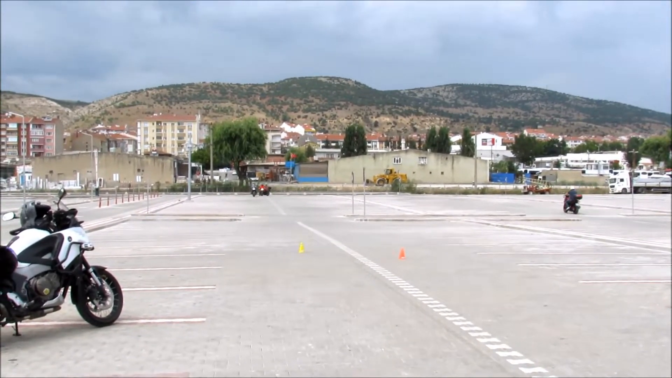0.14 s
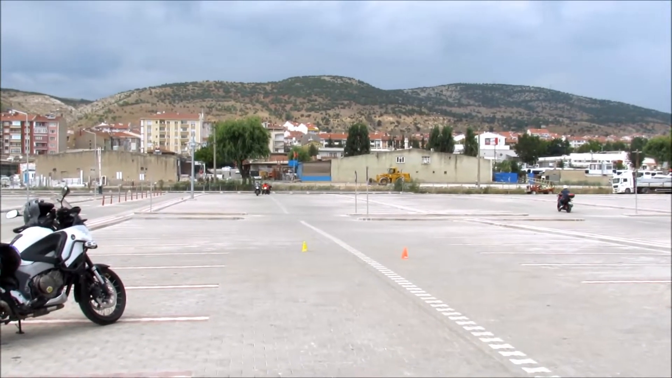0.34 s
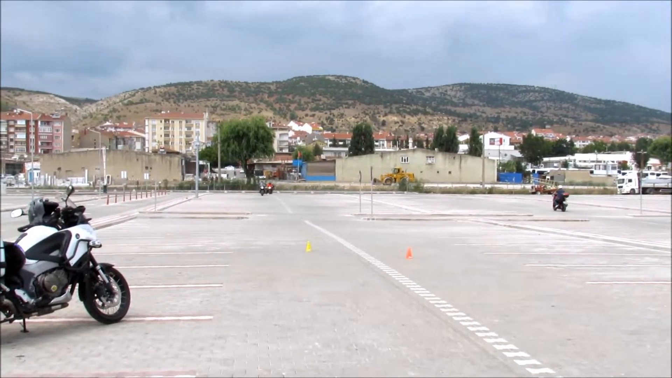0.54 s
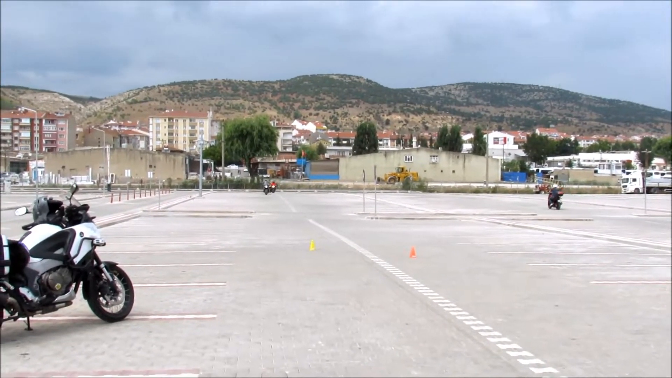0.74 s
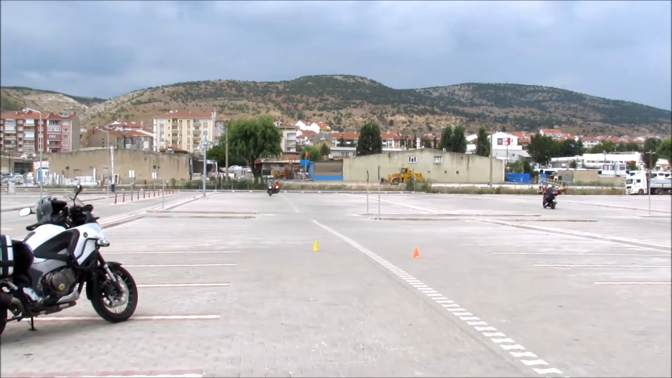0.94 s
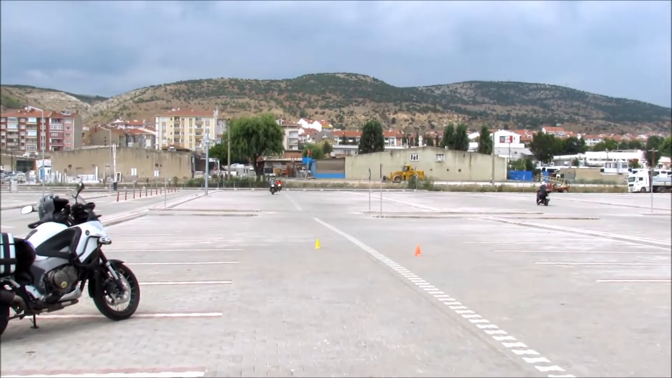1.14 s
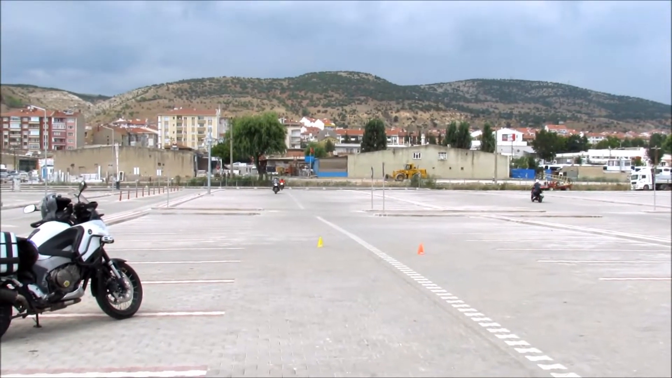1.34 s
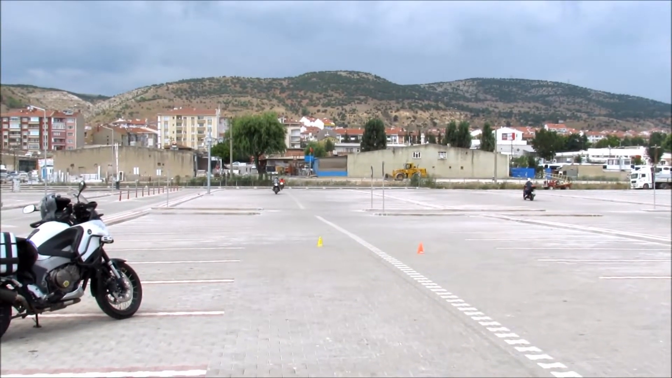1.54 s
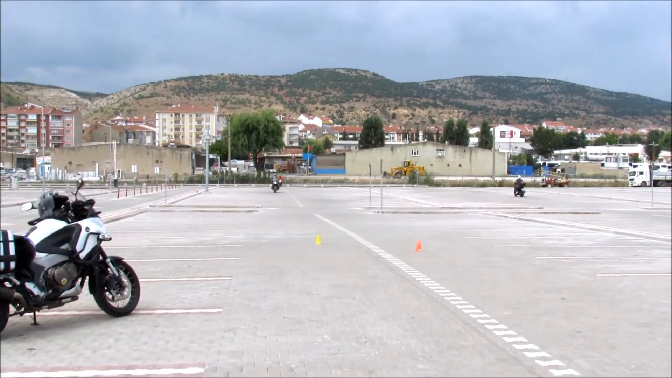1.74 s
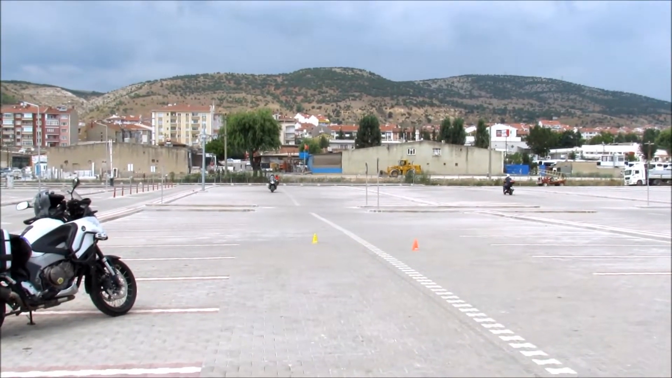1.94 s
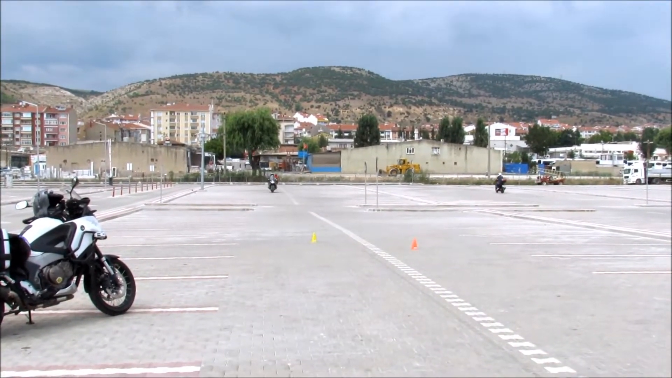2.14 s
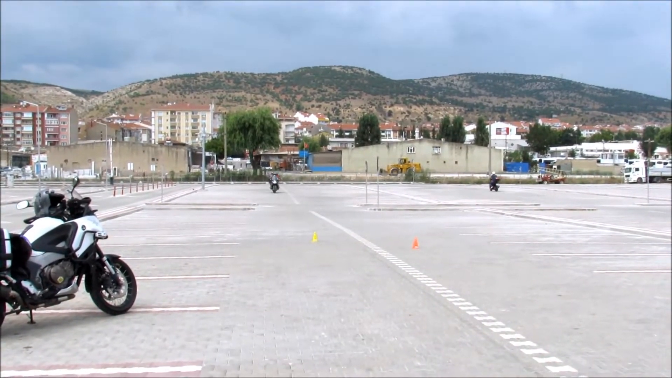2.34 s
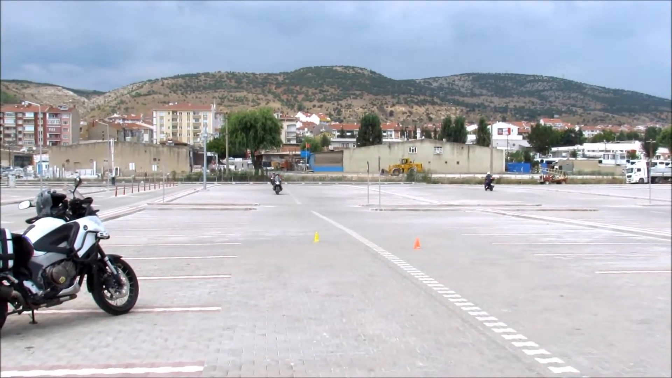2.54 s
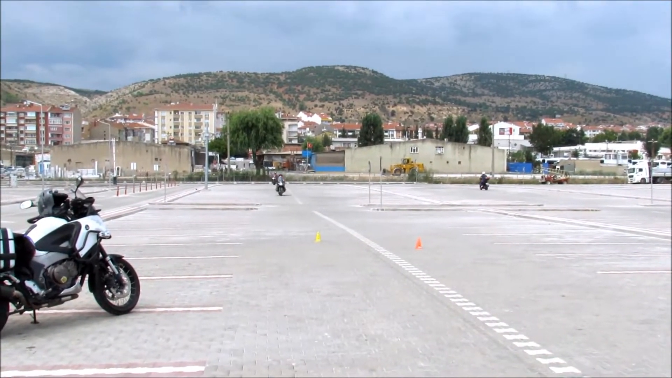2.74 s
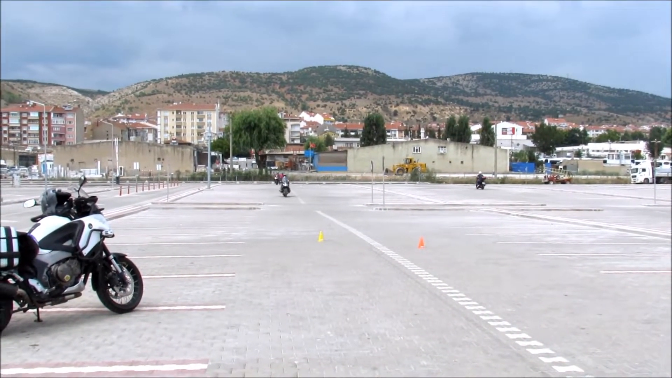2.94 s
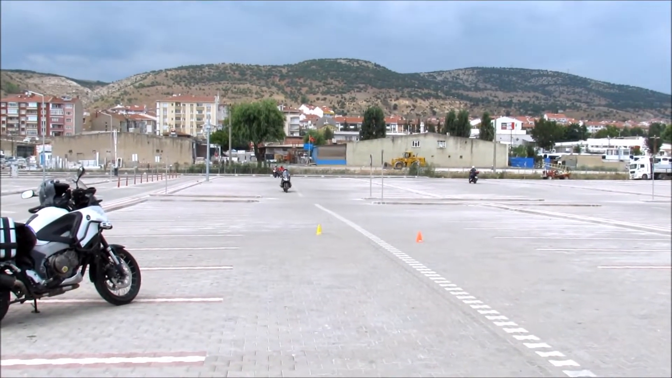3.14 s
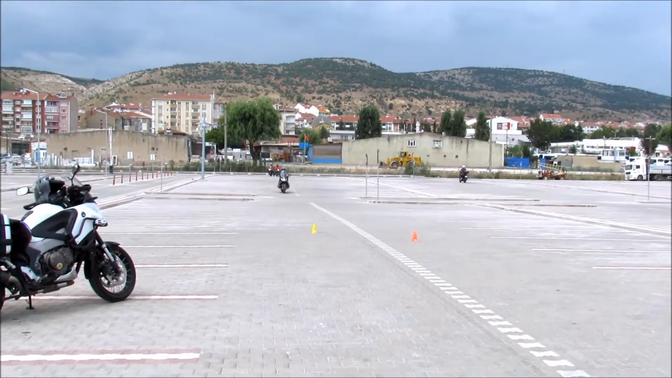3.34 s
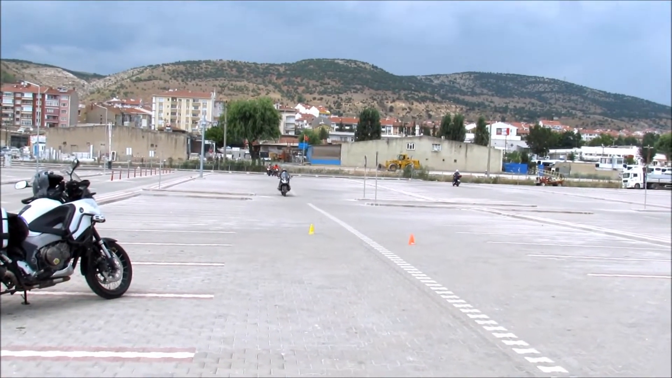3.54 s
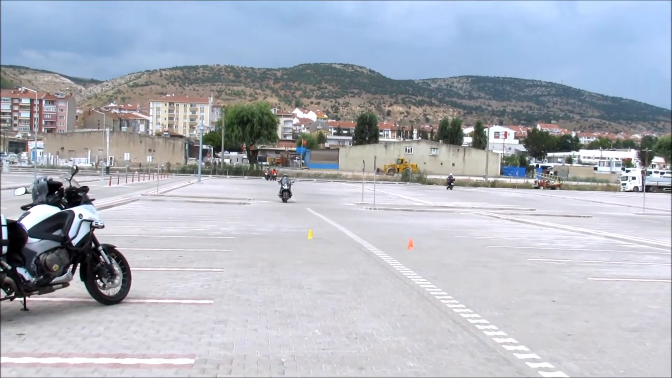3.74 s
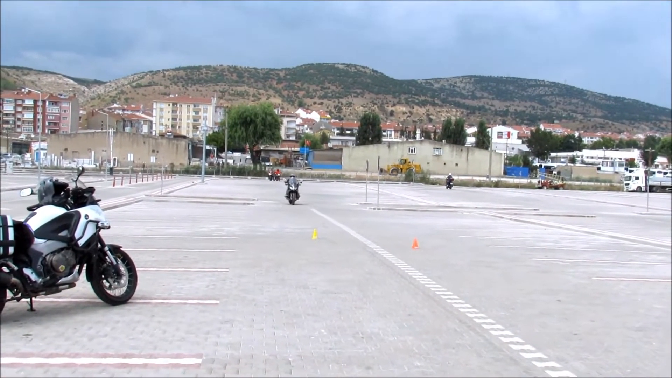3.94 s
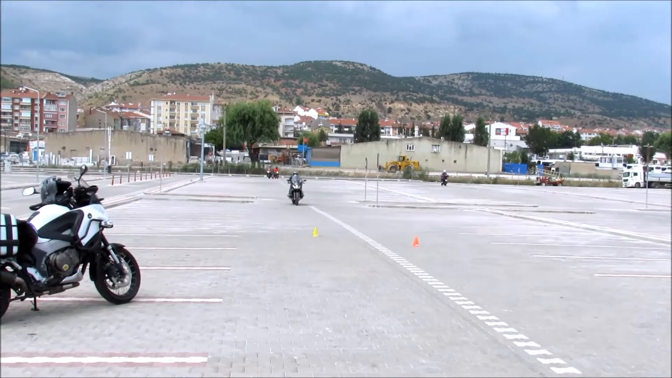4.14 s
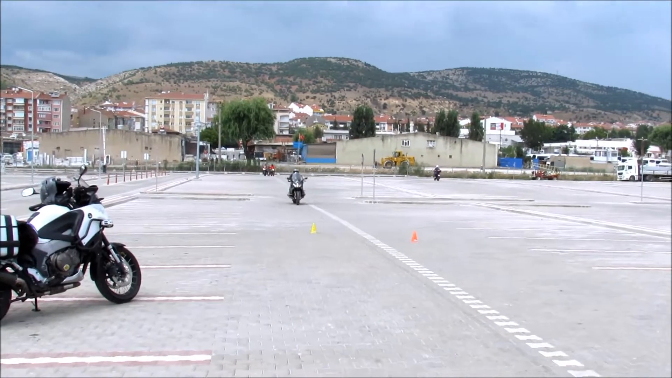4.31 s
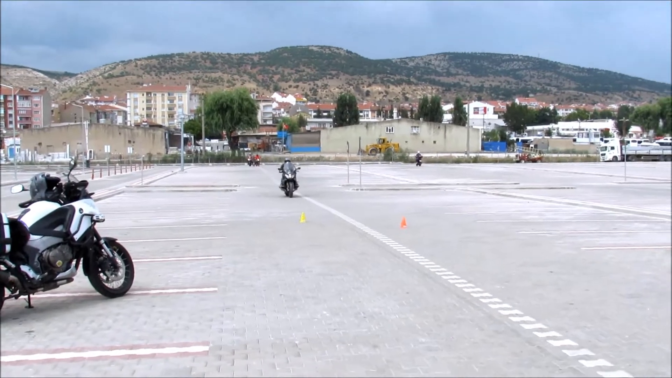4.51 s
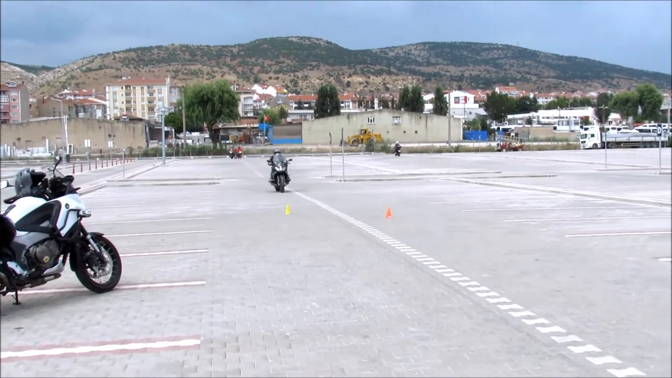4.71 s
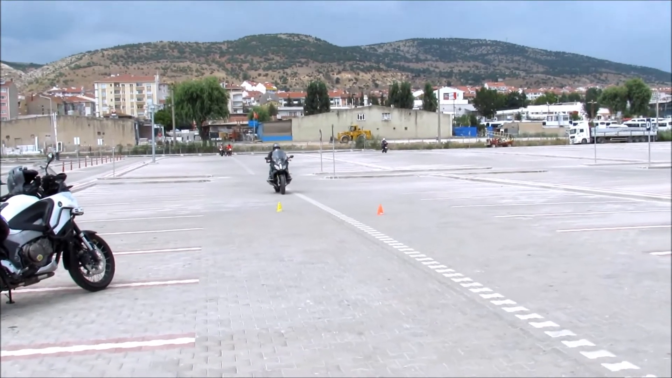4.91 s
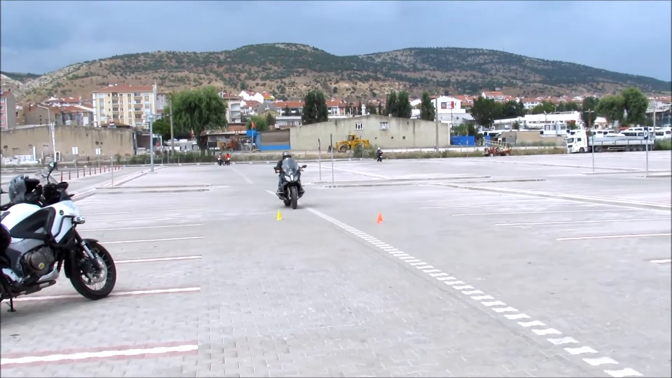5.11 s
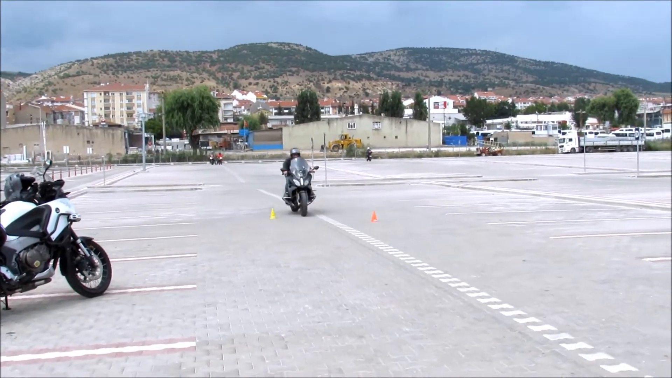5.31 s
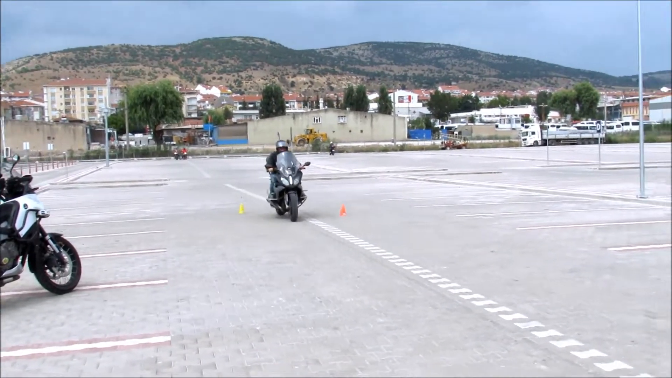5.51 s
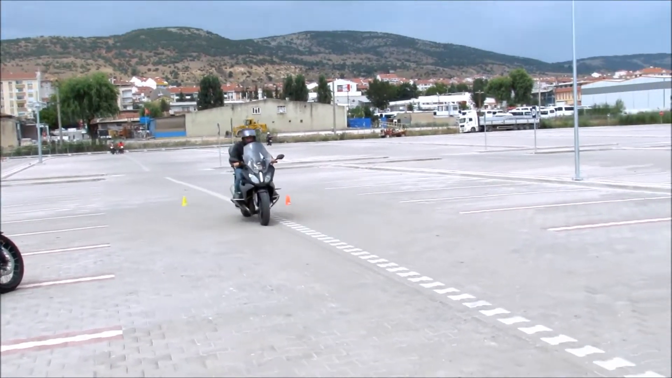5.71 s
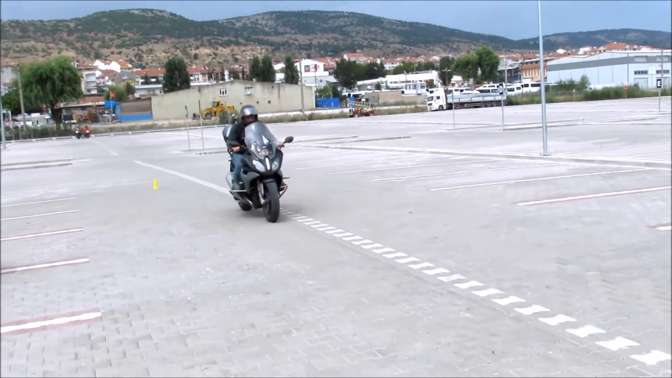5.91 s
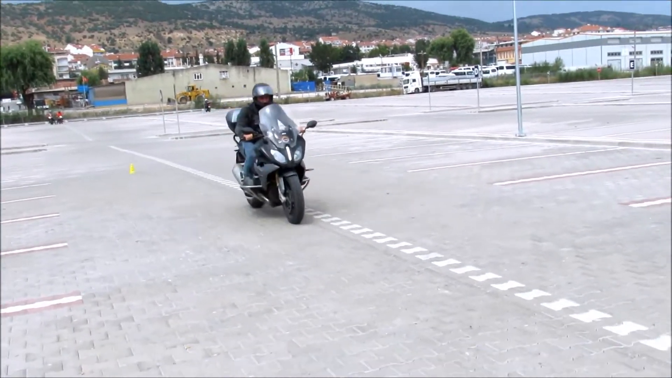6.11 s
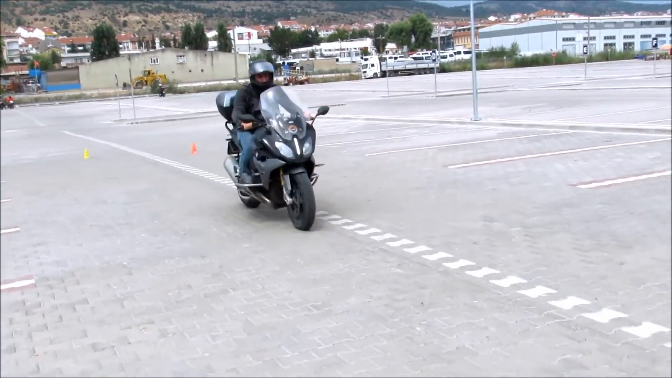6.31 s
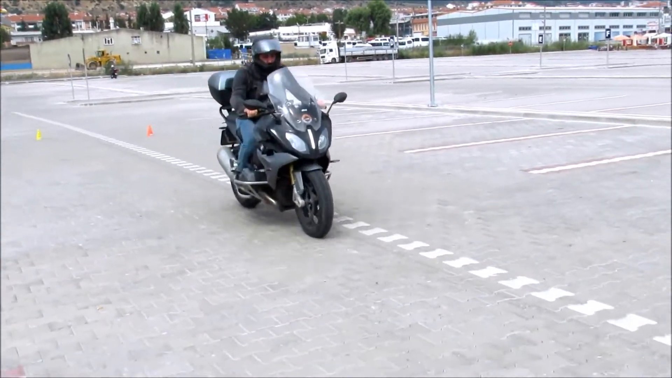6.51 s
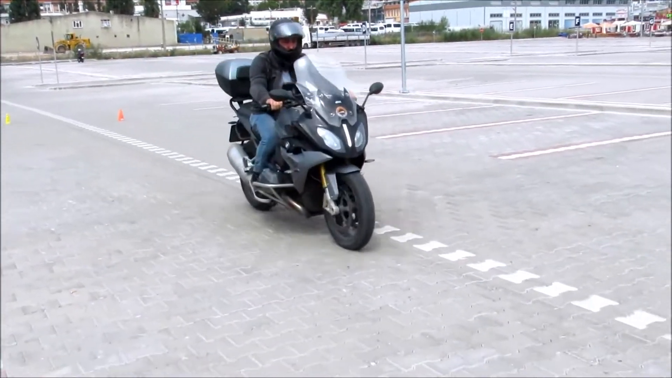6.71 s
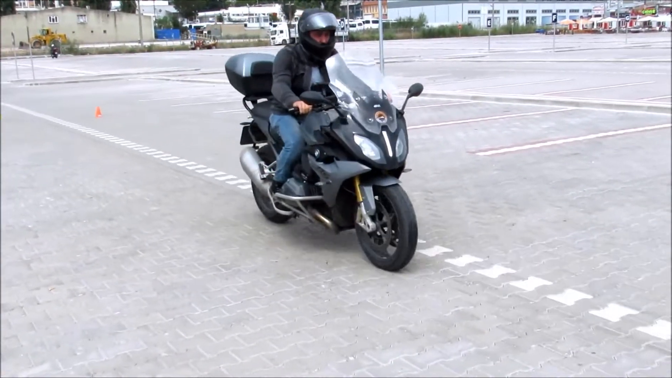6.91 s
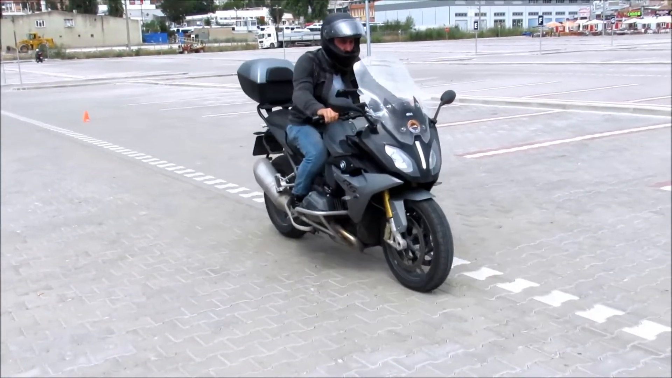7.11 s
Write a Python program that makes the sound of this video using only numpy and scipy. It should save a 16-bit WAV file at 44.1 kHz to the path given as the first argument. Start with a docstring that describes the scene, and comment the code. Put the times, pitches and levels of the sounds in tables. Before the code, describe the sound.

A motorcycle thumps at idle, then pulls closer and grows louder as wind buffets the microphone, ending with short brake scrapes and squeaks.

```python
"""An open paved lot, in gusts that buffet the stereo microphone. A twin-cylinder motorcycle thumps
at idle, opens up and rolls closer, each bang ringing through its pipe and the silencer. Engine
clatter and tyre hiss grow as it nears. A horn toots far off and a second engine winds down;
at the end the brake pads give a few short scrapes and squeaks."""
import sys
import numpy as np
from scipy import signal
from scipy.fft import rfft, irfft
from scipy.io import wavfile

SR = 44100
rng = np.random.default_rng(int(sys.argv[2]) if len(sys.argv) > 2 else 0)


def generate_wav(signal):
    """Clip the signal to [-1, 1] and save it as 16-bit WAV at the path in sys.argv[1]."""
    frames = np.transpose(np.atleast_2d(signal))
    scaled = np.clip(frames, -1, 1) * 32767
    pcm = np.round(scaled).astype(np.int16)
    wavfile.write(sys.argv[1], SR, pcm)


N = 320151
TIME = np.arange(N) / SR

# The twin idles, blips, pulls away and cruises. Each row: time in seconds, four-stroke cycles a second.
ENGINE_SPEED = [(0.0, 16.59), (0.37, 12.55), (0.73, 12.63), (0.94, 13.33), (1.92, 14.08), (2.02, 15.71),
                (2.24, 12.74), (2.55, 12.29), (2.77, 18.1), (3.02, 18.57), (3.38, 15.38), (3.93, 16.13),
                (4.65, 15.69), (4.95, 16.32), (5.37, 16.01), (6.12, 16.99), (7.26, 17.74)]


def amp(db):
    """Decibels to gain."""
    return 10 ** (np.asarray(db) / 20)


def unit(x):
    """Scales to rms 1."""
    return x / np.sqrt(np.mean(x ** 2) + 1e-20)


def curve(rows, axis=1):
    """One column of a table, joined by straight lines in time."""
    rows = np.array(rows)
    return np.interp(TIME, rows[:, 0], rows[:, axis])


def spectrum_db(points, hz):
    """A spectrum, joined by straight lines over log frequency."""
    f, db = np.transpose(points)
    return np.interp(np.log(hz + 1), np.log(f + 1), db)


def noise(points, tilt_db=0):
    """Noise of rms 1 with a given spectrum, tilted by so many dB per octave."""
    hz = np.fft.rfftfreq(N, 1 / SR)
    gain = amp(spectrum_db(points, hz) + tilt_db * np.log2(hz + 1))
    return unit(irfft(rfft(rng.standard_normal(N)) * gain, N))


def wander(per_s):
    """A slow random curve of rms 1."""
    return unit(np.interp(TIME * per_s, np.arange(4000), rng.standard_normal(4000)))


def ring(x, points, size=8192):
    """Minimum-phase filter with a given spectrum: it rings after each blow."""
    log_gain = np.log(amp(spectrum_db(points, abs(np.fft.fftfreq(size, 1 / SR)))))
    response = np.fft.ifft(np.exp(np.conj(signal.hilbert(log_gain)))).real
    return signal.oaconvolve(x, response[:size // 2])[:N]


def below(x, hz, order=2):
    """The part of a sound under a given frequency."""
    return signal.sosfiltfilt(signal.butter(order, hz, fs=SR, output="sos"), x)


def stereo(mid, side):
    """Left and right from the shared part and the difference."""
    return np.array([mid + side, mid - side])


def swell(s, length):
    """A smooth bump centred on s seconds."""
    return np.exp(-np.minimum((2 * (TIME - s) / length) ** 2, 50))


def far_horn(start=2.03, end=2.14, fade_s=0.095):
    """A short toot far off; its fading tail stands for the sound thrown back by buildings."""
    # The horn's partials. Each row: pitch in Hz, level in dB.
    partials = [(1212, -49), (2424, -56), (2830, -62)]
    gate = np.clip((TIME - start) / 0.01, 0, 1) * np.exp(-np.maximum(TIME - end, 0) / fade_s)
    tone = sum(amp(db) * unit(np.sin(2 * np.pi * hz * TIME)) for hz, db in partials)
    return gate * tone * amp(1.9 * wander(29.5))


def second_engine(roughness=0.095, weak_below_hz=55):
    """A higher-revving engine drones, then winds down, throttle shut; its lowest note fades as it sinks."""
    # Its run. Each row: time in seconds, firings a second, level in dB.
    run = [(3.85, 57, -36), (4.15, 62, -31), (4.7, 67.6, -23), (4.97, 73.6, -23.5), (5.18, 65, -23.5),
           (5.3, 55.4, -17), (5.55, 45, -22.5), (5.85, 31, -42)]
    # Its first three harmonics, each a relative level in dB.
    harmonics = [-4.5, 0, -11.5]
    firings = np.cumsum(curve(run) * (1 + .005 * wander(30))) / SR
    drone = unit(sum(amp(db) * np.cos(2 * np.pi * k * firings) for k, db in enumerate(harmonics, 1)))
    running = (TIME > run[0][0]) & (TIME < run[-1][0])
    level = running * (1 + roughness * wander(45)) * amp(curve(run, axis=2))
    return (drone - below(drone, weak_below_hz)) * level


def wind(breeze_db=-33.5, lumps_db=2.0, mid_db=-13, side_db=-2.0):
    """Gusts over a light breeze buffet the microphone in lumps, mostly opposite in left and right."""
    # The gusts. Each row: peak time in seconds, length in seconds, relative level in dB.
    gusts = [(.08, .12, -12), (0.623, 0.33, -15.5), (1.017, 0.15, -10.5), (1.247, 0.13, -19),
             (1.597, 0.64, -29), (2.55, 0.15, -19.5), (3.05, 0.3, -33), (3.907, 0.041, -17),
             (5.11, 0.32, -20.5), (5.504, 0.63, -29), (5.964, 0.32, -16), (6.4, 0.42, -13)]
    # Rumble of air on the microphone. Each row: frequency in Hz, relative density in dB.
    buffet = [(20, -17), (54, -5), (104, 5), (200, -4), (320, -19.5), (600, -37), (700, -46.5), (3300, -71)]
    force = amp(breeze_db) + sum(amp(db) * swell(s, length) for s, length, db in gusts)
    lumps = unit(amp(lumps_db * wander(45)))
    return force * lumps * stereo(amp(mid_db) * noise(buffet), amp(side_db) * noise(buffet))


def brakes(waver=.028, grit_db=3.0, overtone_db=-24, side_db=-10):
    """Close by, the pads scrape and now and then catch in a brief rough squeak."""
    # Pads catching. Each row: peak time in seconds, length in seconds, level in dB, pitch in Hz.
    squeaks = [(6.546, 0.0058, -14, 2420), (6.566, 0.023, -20.5, 2375), (6.981, 0.0084, -23.5, 2450)]
    # Pads rubbing. Each row: peak time and rough length in seconds, level in dB, tilt in dB per octave.
    scrapes = [(5.6, 0.0026, -35, 1), (5.764, 0.017, -36, -5), (6.095, 0.048, -47, 6),
               (6.151, 0.008, -34, -1.5), (6.554, 0.046, -33, 1.5), (6.598, .015, -38, -2),
               (6.975, 0.055, -36.5, -3.5), (7.03, 0.012, -30.5, -4), (7.093, 0.015, -29.5, -5.5)]
    # Colour of the rubbing before the tilt. Each row: frequency in Hz, relative density in dB.
    rub_colour = [(600, -17), (1000, 3.5), (2500, 6.5), (4200, 3), (7000, 0.5), (11000, -9), (16000, -24)]
    out = np.zeros((2, N))
    for s, length, db, hz in squeaks:
        angle = 2 * np.pi * np.cumsum(hz * (1 + waver * wander(600))) / SR
        tone = np.sin(angle) + amp(overtone_db) * np.sin(2 * angle)
        squeak = unit(tone * amp(grit_db * wander(900)))
        out += amp(db) * swell(s, length) * squeak * amp([[-.5], [.5]])  # a little to the right
    for s, length, db, tilt_db in scrapes:
        rub = noise(rub_colour, tilt_db)
        # each scrape bites quickly and lets go more slowly
        stroke = np.where(TIME < s, swell(s, length * 1.15), swell(s, length * 1.36))
        out += amp(db) * stroke * stereo(rub, amp(side_db) * rub[::-1])
    return out


def whines(side_db=-11, waver_db=2):
    """Tyres and drive whine in narrow bands of hiss, each swelling once as the bike rolls in."""
    # The bands. Each row: peak time and rough length in seconds, centre and width in Hz, level in dB.
    bands = [(3.1, 1.8, 3400, 200, -66.5), (4.75, 0.79, 6850, 400, -54), (4.8, 0.63, 7700, 300, -57),
             (4.8, 0.56, 10800, 900, -57), (4.8, 0.65, 12700, 2400, -57)]
    hz, out = np.fft.rfftfreq(N, 1 / SR), np.zeros((2, N))
    for s, length, centre, width, db in bands:
        gain = 1 / (1 + ((hz - centre) / width) ** 2) ** 2
        mid, side = (unit(irfft(rfft(white) * gain, N)) for white in rng.standard_normal((2, N)))
        # it builds slowly and stops sooner, as when the throttle shuts
        envelope = np.where(TIME < s, swell(s, 2 * length), swell(s, length))
        out += stereo(mid, amp(side_db) * side) * envelope * amp(db + waver_db * wander(50))
    return out


def clatter_and_tyres(cycles, throb_depth=0.1, flutter_db=0.6, clatter_db=5.5, hiss_db=-10.5):
    """Valve and gear clatter throbs once a crank turn; tyre hiss lies above it."""
    # Colours of the clatter and of the tyres. Each row: frequency in Hz, relative density in dB.
    clatter_colour = [(300, 6), (500, 3.5), (600, -5.5), (700, -22.5), (800, -5), (1000, -3), (1180, -1.5),
                      (1600, -4), (1950, -7), (2300, -5), (2650, -7.5), (3000, -12), (4200, -15.5),
                      (8000, -32.5)]
    tyre_colour = [(1200, 0), (3400, -21), (4500, -0.5), (6200, 4), (7300, 3.5), (8500, 1.5), (11000, -1),
                   (13000, -11), (15800, -27)]
    # Both grow as the bike nears the microphone. Each row: time in seconds, relative level in dB.
    approach = [(0, -57.5), (1.7, -51), (3.4, -43), (7.26, -42)]
    # Brief surges. Each row: peak time and length in seconds, rise of clatter and of hiss in dB.
    surges = [(.75, 0.38, 2.5, 1.5), (4.827, 0.89, 4.5, 5.5), (5.13, 0.3, 3, -1.5), (5.77, 0.3, 4, 6)]
    throb = (1 + throb_depth * np.cos(2 * np.pi * 2 * cycles)) * amp(flutter_db * wander(180))
    clatter = stereo(noise(clatter_colour), amp(-19) * noise(clatter_colour)) * unit(throb)
    hiss = stereo(noise(tyre_colour), amp(-9) * noise(tyre_colour)) * amp(1.2 * wander(120))
    clatter_rise, hiss_rise = sum(np.outer(rise, swell(s, length)) for s, length, *rise in surges)
    running = clatter * amp(clatter_rise + clatter_db) + hiss * amp(hiss_rise + hiss_db)
    return amp(curve(approach)) * running


def bangs(cycles, second_fires=.555, uneven_db=2.07, jitter_s=0.00014, spill=0.1):
    """Two cylinders fire at uneven gaps, once a cycle each; no two bangs are quite alike."""
    first, second = np.zeros((2, N))
    for own, other, offset in ((first, second, 0), (second, first, second_fires)):
        at = np.flatnonzero(np.diff(np.floor(cycles - offset)) > 0)
        force, late, share = rng.standard_normal((len(at), 3)).T
        at = np.clip(at + np.round(late * jitter_s * SR).astype(int), 0, N - 1)
        own[at] += amp(uneven_db * force)
        other[at] += spill * share  # part of each bang spills into the other header
    return first, second


def exhaust(cycles, gas_db=-19, boom_db=-1, bark_db=-12.5, bark_db_per_octave=9.5, idle_hz=13):
    """Bangs ring through the pipes over rushing gas; the bark above the boom grows with engine speed."""
    # One bang of each cylinder through pipe and silencer. Each row: frequency in Hz, relative gain in dB.
    first_pipe = [(25, -22.5), (45, -34.5), (62, 8.5), (82, 22), (104, 7.5), (125, 15), (165, 12),
                  (215, 1.5), (315, -2.5), (360, -14.5), (510, -27), (610, -37), (700, -56.5), (1100, -63)]
    second_pipe = [(25, -27.5), (45, -10), (74, 7), (102, -3.5), (142, 19), (180, 9.5), (215, 0), (250, 1),
                   (320, -3.5), (365, -12.5), (520, -27.5), (610, -42), (700, -51.5), (1100, -69)]
    # Rushing exhaust gas. Each row: frequency in Hz, relative density in dB.
    gas_colour = [(20, -22), (110, -6), (320, -4.5), (450, -24), (700, -39), (1500, -74)]
    # How hard the engine works. Each row: time in seconds, relative exhaust level in dB.
    effort = [(0, -30), (.1, -27.5), (.23, -31.5), (.75, -23), (1.9, -19), (2.03, -17), (2.16, -23),
              (2.5, -21), (2.66, -14), (3.75, -15), (4.08, -18), (4.65, -14), (5.2, -16), (5.9, -14.5),
              (6.1, -22), (6.3, -19), (7.26, -19.5)]
    # The deepest note thins now and then. Each row: centre time and length in seconds, gain in dB.
    bass_dips = [(3.04, 0.18, -11), (3.888, 0.19, -17), (5.25, 0.88, -12)]
    first, second = bangs(cycles)
    pipes = ring(first, first_pipe) + ring(second, second_pipe)
    muffled = signal.sosfilt(signal.butter(2, 1500, fs=SR, output="sos"), pipes)
    tailpipe = unit(muffled) + amp(gas_db) * noise(gas_colour)
    boom = below(tailpipe, hz=215)
    revs_db = bark_db_per_octave * np.log2(curve(ENGINE_SPEED) / idle_hz)
    bark = unit(tailpipe - boom) * amp(bark_db + revs_db)
    thump = (unit(boom) * amp(boom_db) + bark) * amp(curve(effort))
    dip_db = sum(db * swell(s, length) for s, length, db in bass_dips)
    thump += below(thump, hz=113, order=4) * (amp(dip_db) - 1)
    # the bike is off centre: the difference between left and right follows the slope of the wave
    slope = np.gradient(thump)
    return stereo(thump, amp(-18) * slope * thump.std() / slope.std())


def scene():
    """One crank drives exhaust and clatter; the rest of the lot sounds around it."""
    cycles = .776 + np.cumsum(curve(ENGINE_SPEED)) / SR  # two crank turns to a cycle
    bike = exhaust(cycles) + clatter_and_tyres(cycles) + whines()
    return bike + second_engine() + wind() + brakes() + far_horn()


def record(dry):
    """The recorder clips at full scale and cuts the treble above 15.8 kHz."""
    lowpass = signal.firwin(511, 15800, window=("kaiser", 9), fs=SR)
    return signal.oaconvolve(np.clip(dry, -1, 1), lowpass[None], "same")


dry = scene()
out = record(dry)
generate_wav(out)
```